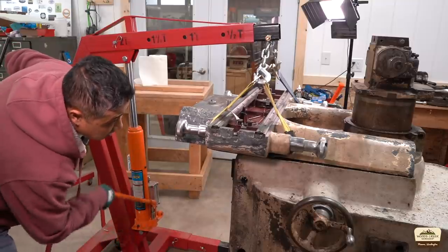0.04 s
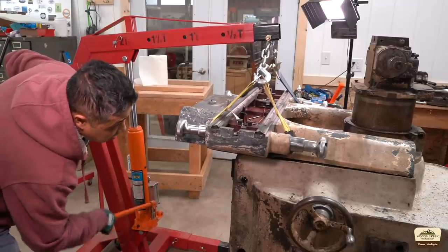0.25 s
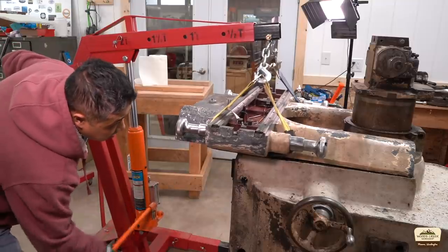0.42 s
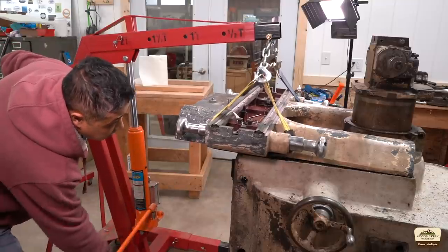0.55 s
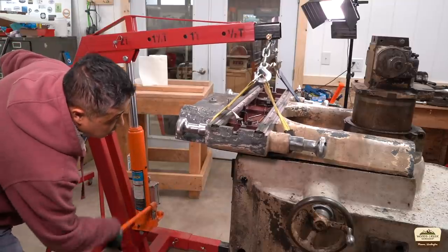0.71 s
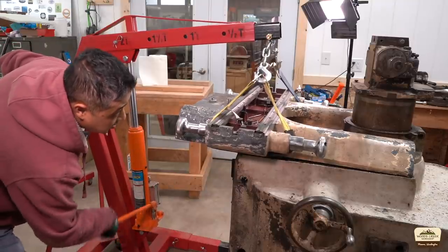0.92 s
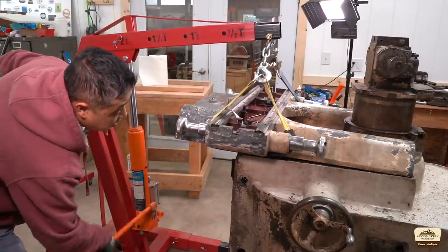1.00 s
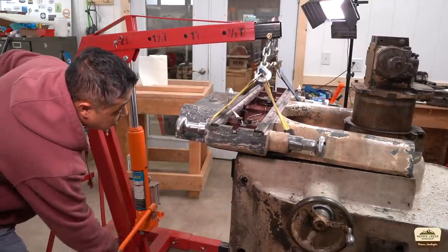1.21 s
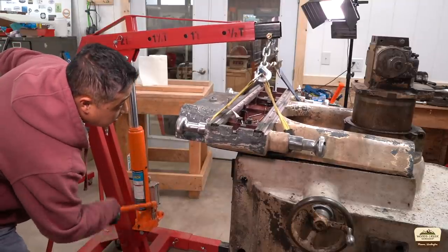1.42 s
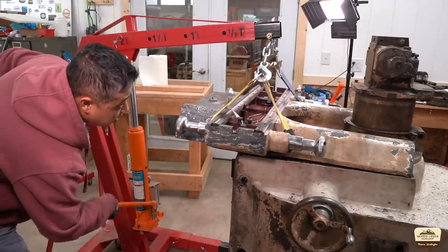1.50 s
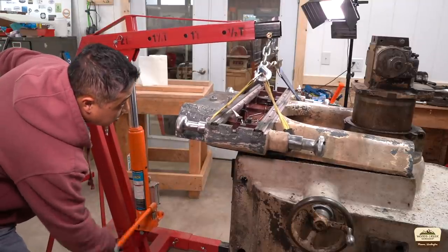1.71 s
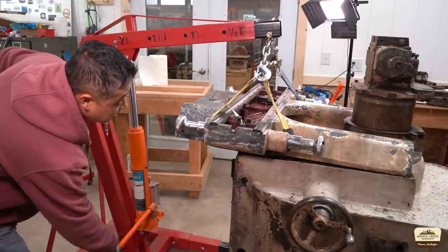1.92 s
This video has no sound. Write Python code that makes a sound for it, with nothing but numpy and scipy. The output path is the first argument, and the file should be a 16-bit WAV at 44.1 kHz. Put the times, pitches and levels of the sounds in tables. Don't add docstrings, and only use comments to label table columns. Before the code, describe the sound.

A hand-pumped hydraulic hoist works under load in a small workshop. At 0.2 s its steel handle clacks hard and rings, rebounding until 0.3. Faint taps and light ticks follow to 0.75. Dry linkage knocks come at 0.96-1.02, a low frame thud with faint groan at 1.2, a bright pin tick at 1.34, and a piston clunk at 1.64, fading into quiet hiss.

```python
import sys
import numpy as np
from scipy import signal
from scipy.fft import rfft, irfft
from scipy.io import wavfile
from scipy.ndimage import uniform_filter1d

SR = 44100
rng = np.random.default_rng(int(sys.argv[2]) if len(sys.argv) > 2 else 0)


def wav_out(sig):
    wavfile.write(sys.argv[1], SR, np.round(np.clip(np.atleast_2d(sig).T, -1, 1) * 32767).astype(np.int16))


def decibels_to_gain(level_db):
    exponent = np.asarray(level_db, float) / 20
    return 10 ** exponent


N = 85995

# t/s, peak level/dB, tilt/(dB per octave), contact/ms
EARLIER_STROKE = [
    (0.0, -56.5, 1.6, 6.6),
]
PISTON_LANDINGS = [
    (1.307, -47, -1.5, 2.4),
    (1.617, -45, -10, 2),
    (1.625, -33.5, 7.5, 3.95),
    (1.630, -34, -0.5, 1.76),
    (1.638, -25.5, -4, 1.91),
    (1.655, -36, -2.5, 1.8),
]
PIN_TICKS = [(0.090, -45, 1.5, 1.8), (0.718, -40.5, -1, 1.53), (0.727, -37.5, -1, 1.8),
             (0.740, -49, 0.5, 4), (0.910, -49, 0.27, 1.4), (1.336, -30, 2.5, 0.59), (1.345, -35, 2.5, 2.1),
             (1.355, -43, 2, 1.7), (1.262, -45, -5.5, 2.6), (1.481, -54, 3.5, 2.4),
             (1.581, -47.5, -0.5, 3.6), (1.939, -54.5, -5, 2.6)]
HANDLE_CLACKS = [
    (0.176, -50, -6.5, 3.4),
    (0.201, -33, -2.5, 5.7),
    (0.206, -16.5, 0.5, 1.53),
    (0.249, -31, -0.5, 4),
    (0.260, -28, -4, 2.1),
    (0.288, -35, -4, 1.05),
    (0.692, -51.5, -9.5, 2.5),
]
MAST_SWAYS = [
    (0.215, -49, 1, 5.5),
    (1.000, -48, 1, 4),
    (1.645, -51, 0.33, 4.5),
]
FRAME_THUDS = [
    (0.262, -42, 5, 6),
    (0.400, -47.5, -4.5, 5.4),
    (0.479, -55.5, -11, 4),
    (0.558, -51.5, -15, 5.5),
    (1.182, -31, 5.5, 2.6),
    (1.200, -30.5, 2.5, 9.5),
    (1.305, -50, -16, 5.5),
    (1.690, -54, 4, 9.1),
]
BOX_TAPS = [
    (0.375, -49, 5.5, 2.4),
    (0.534, -46.5, 5.5, 2.5),
    (0.730, -52.5, 8, 6.3),
    (1.800, -51, -9, 8.3),
]
LINK_KNOCKS = [
    (0.565, -60, 1, 6.9),
    (0.651, -51, -1, 4.3),
    (0.957, -44.5, -1, 2.2),
    (0.961, -33, 1, 3),
    (0.987, -44.5, -9, 2.8),
    (0.994, -35, 7.5, 4.1),
    (1.000, -30, -1.5, 3.9),
    (1.021, -36.5, -3.5, 2.3),
]
VALVE_SQUEAKS = [
    (0.572, -73, 1, 10),
]
LEG_FLEXES = [
    (1.005, -48, 11.5, 3.9),
    (1.205, -43, 1, 7.4),
    (1.365, -53, 1.1, 11),
    (1.670, -52, 1.2, 11),
]

# f/Hz in one table, level/dB and t60/s in the other
PISTON_HZ = [580, 760, 974, 1350, 1640, 1836, 3400, 5200, 8800, 9300, 11500]
PISTON_RING = [(-6, 0.048), (-12.5, 0.059), (-2, .1), (3, .07), (-28.5, 0.068), (-0.5, 0.12), (-0.5, 0.21),
               (-12.5, 0.11), (-5, .1), (-14, .05), (-11.5, 0.044)]
PIN_HZ = [2500, 3400, 4264, 5200, 6300, 7730, 9000]
PIN_RING = [(1, 0.06), (0, 0.1), (-4.5, 0.074), (-1.5, .14), (-4, .05), (-4, 0.055), (-10, .06)]
HANDLE_HZ = [590, 1000, 1269, 1351, 1850, 2630, 3378, 3475, 4007, 4193, 5490, 6018, 8000, 8900]
HANDLE_RING = [(-9.5, 0.085), (-9, .12), (16.5, 0.29), (-5, 0.13), (17.5, 0.057), (5, .15), (-7, .3),
               (27.5, 0.14), (1, .35), (-5, .3), (-4.5, 0.029), (-3, 0.027), (-9, .04), (11.5, 0.073)]
# f/Hz, level/dB, t60/s
MAST_MODES = [(1200, -1, .6), (1324, -2, .8), (1385, 0, .8)]
FRAME_MODES = [(83, -3.5, 0.47), (132.1, 9.5, 0.55), (224, 13.5, 0.099), (340.5, -3.5, 0.35),
               (486, -8, 0.37)]
BOX_MODES = [(400, -7, 0.097), (589, 0, 0.025)]
LINK_MODES = [(593, 6.5, 0.14), (987, 1, 0.1), (1341, 10.5, 0.07), (1620, -11, 0.057), (1850, 15.5, 0.04),
              (2160, -10, 0.16), (2864, 7.5, 0.04), (3645, 4, 0.038), (5440, -1.5, 0.13), (9430, -10, 0.11)]
VALVE_MODES = [(10000, 0, 0.071)]
LEG_MODES = [(126, 0, .9), (194, -9, .7), (292, -10, .7), (336, -5, .9)]

# f/Hz, level/dB
PISTON_COLOUR = [(47, -43), (80, -22), (718, 0.5), (917, -3), (1370, 5), (2330, -2.5), (8990, -10.5),
                 (16000, -55)]
PIN_COLOUR = [(180, -20), (300, -5.5), (1320, -9), (2030, -13.5), (3350, -2.5), (5340, -4.5), (8500, -16.5),
              (16000, -41)]
HANDLE_COLOUR = [(47, -55), (80, -52), (283, -10), (1170, -11), (1310, -1), (2970, -8.5), (3470, 4),
                 (16000, -29.5)]
FRAME_COLOUR = [(24, -37), (40, -6.5), (102, 11), (219, -2.5), (488, -4.5), (604, -18), (1500, -49),
                (1950, -102), (3300, -120)]
LINK_COLOUR = [(47, -58.5), (80, -29.5), (378, -8), (1200, -9.5), (1340, -4), (2380, -11), (8790, -27.5),
               (16000, -64.5)]

BALANCE = {"handle": (0.61, -1.2, .008), "link": (-3, -1.5, 0.039), "piston": (-3, -2.5, 0.017),
           "pin": (-2.5, -2.4, 0.014), "frame": (5.6, -9, 0.035), "box": (6.1, -0.43, 0.023),
           "boom": (15, -9.5, 0.0034), "valve": (25, -4, 0.019)}
# f/Hz, t60/s
ROOM_DECAY = [(100, 0.76), (500, 0.38), (2000, 0.37), (6000, 0.33), (14000, 0.27)]
# f/Hz, level/dB
FLOOR_COLOUR = [(15, -41.5), (25, -19.5), (120, -2), (451, -1.5), (840, -8.5), (1330, -0.5), (1610, -14),
                (4140, -12), (16000, -31)]

FLOOR_DB = -65
SPAN = 2 ** 15
ROOM_GAP_S, ROOM_BUILD_S = 0.0034, 0.0058
EARLY_DB, EARLY_T60_S = 9.5, 0.049
SCATTER_DB, GRIT_DB = 2.5, 3
RADIATE_HZ, SOFT_HZ = 75, 700


def curve(table, hz):
    table = np.array(table, float)
    return np.interp(np.log(np.maximum(hz, 1)), np.log(table[:, 0]), table[:, 1])


def causal(db):
    cepstrum = irfft(db * np.log(10) / 20)
    cepstrum[1:len(cepstrum) // 2] *= 2
    cepstrum[len(cepstrum) // 2 + 1:] = 0
    return np.exp(rfft(cepstrum))


def unit(x):
    return x / np.sqrt(np.sum(x ** 2))


def room():
    t = np.arange(SPAN) / SR
    hz = np.arange(SPAN // 2 + 1) * SR / SPAN
    noise = rfft(rng.standard_normal(SPAN))
    early = decibels_to_gain(EARLY_DB - 60 * t / EARLY_T60_S)
    echoes = 0
    for centre in 40 * 2. ** np.arange(10):
        band = np.cos(np.pi / 2 * np.clip(np.log2((hz + 1) / centre), -1, 1)) ** 2
        late = decibels_to_gain(-60 * t / curve(ROOM_DECAY, centre))
        echoes = echoes + irfft(noise * band) * (late + early)
    return unit(echoes * np.clip((t - ROOM_GAP_S) / ROOM_BUILD_S, 0, 1))


def strike(blows, modes, colour, balance):
    ring_db, room_db, family_width = balance
    t = np.arange(SPAN) / SR
    hz = np.arange(SPAN // 2 + 1) * SR / SPAN
    f, db, t60 = np.array(modes, float).T[:, :, None]
    fade = decibels_to_gain(db - 60 * t / t60) / np.sqrt(t60)
    family = np.vstack([f * (1 + family_width * shift * (0.5 + rng.random(f.shape)))
                        for shift in (0.045, 0.72, -1, 0.017, -0.447)])
    rings = np.vstack([fade] * 5) * np.sin(2 * np.pi * t * family)
    ring_energy = np.sum(rings ** 2)
    bins = (family[:, 0] * SPAN / SR).astype(int)
    space = 1 + decibels_to_gain(room_db) * rfft(room())
    crack = rfft(unit(irfft(causal(curve(colour, hz)))))
    out = np.zeros(N + SPAN)
    for start, peak_db, tilt_db, ms in blows:
        grit = rng.standard_normal((2, SPAN))
        spread = rng.standard_normal(len(rings))
        k = t / max(ms, 0.1) * 1000
        push = rfft(grit[0] * decibels_to_gain(GRIT_DB * grit[1]) * k * np.exp(-k))
        drive = abs(push[bins]) + 0.25 * abs(push).mean()
        even = np.sqrt(np.mean(abs(push) ** 2)) / drive
        weights = even * decibels_to_gain(SCATTER_DB * spread) * np.sign(spread)
        ring = rfft(weights @ rings) / np.sqrt(ring_energy)
        lean = causal(tilt_db * np.log2((hz + 250) / 2000))
        blow = irfft(push * lean * (crack + decibels_to_gain(ring_db) * ring) * space)
        peak = np.sqrt(uniform_filter1d(blow ** 2, size=176).max())
        i = int(max(start, 0) * SR)
        out[i:i + SPAN] += blow * decibels_to_gain(peak_db) / peak
    return out[:N]


def soften(x):
    return signal.sosfilt(signal.butter(4, SOFT_HZ, fs=SR, output="sos"), x)


def workshop_floor():
    hz = np.arange(N // 2 + 1) * SR / N
    hiss = irfft(rfft(rng.standard_normal(N)) * decibels_to_gain(curve(FLOOR_COLOUR, hz)), N)
    sway_db = np.interp(np.arange(N), np.linspace(0, N, num=12), rng.standard_normal(12))
    return unit(hiss) * np.sqrt(N) * decibels_to_gain(FLOOR_DB + sway_db)


def piston():
    modes = np.column_stack([PISTON_HZ, PISTON_RING])
    return strike(PISTON_LANDINGS + EARLIER_STROKE, modes, PISTON_COLOUR, BALANCE["piston"])


def pins():
    return strike(PIN_TICKS, np.column_stack([PIN_HZ, PIN_RING]), PIN_COLOUR, BALANCE["pin"])


def handle():
    modes = np.column_stack([HANDLE_HZ, HANDLE_RING])
    return strike(HANDLE_CLACKS, modes, HANDLE_COLOUR, BALANCE["handle"])


def mast():
    return strike(MAST_SWAYS, MAST_MODES, LINK_COLOUR, BALANCE["boom"])


def frame():
    return soften(strike(FRAME_THUDS, FRAME_MODES, FRAME_COLOUR, BALANCE["frame"]))


def toolbox():
    return strike(BOX_TAPS, BOX_MODES, FRAME_COLOUR, BALANCE["box"])


def linkage():
    return strike(LINK_KNOCKS, LINK_MODES, LINK_COLOUR, BALANCE["link"])


def valve():
    return strike(VALVE_SQUEAKS, VALVE_MODES, PIN_COLOUR, BALANCE["valve"])


def legs():
    return soften(strike(LEG_FLEXES, LEG_MODES, FRAME_COLOUR, BALANCE["boom"]))


def scene():
    hoist = piston() + pins() + handle() + mast() + frame() + toolbox() + linkage() + valve() + legs()
    radiated = signal.sosfilt(signal.butter(4, RADIATE_HZ, "high", fs=SR, output="sos"), hoist)
    return (radiated + workshop_floor())[None]


def top_cut(x):
    return signal.sosfilt(signal.butter(12, 16340, fs=SR, output="sos"), x)


def record(dry):
    return top_cut(dry)


dry = scene()
out = record(dry)
wav_out(out)
```